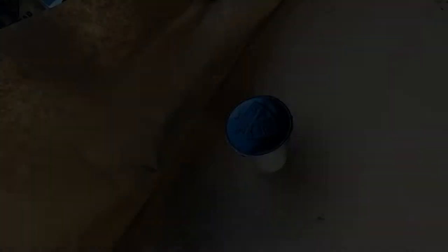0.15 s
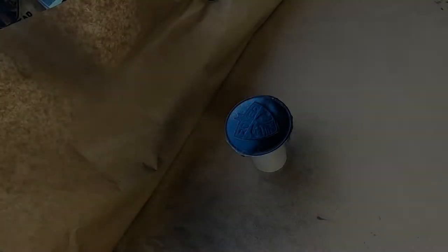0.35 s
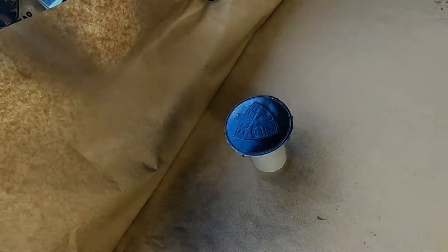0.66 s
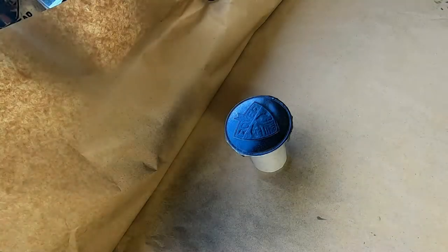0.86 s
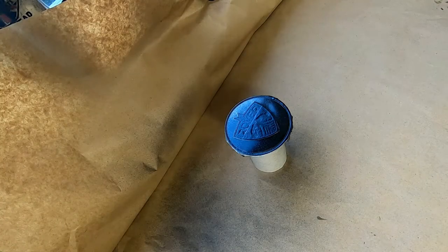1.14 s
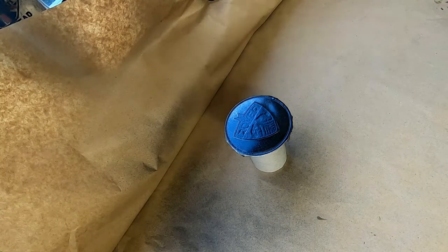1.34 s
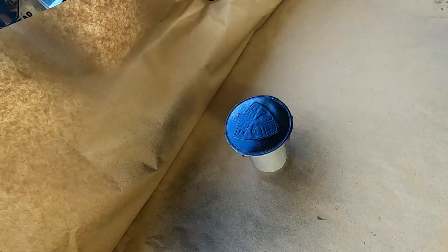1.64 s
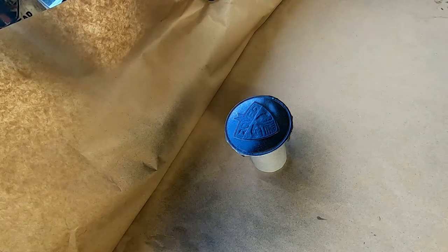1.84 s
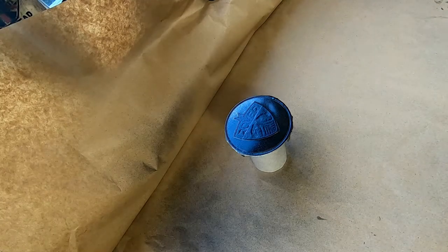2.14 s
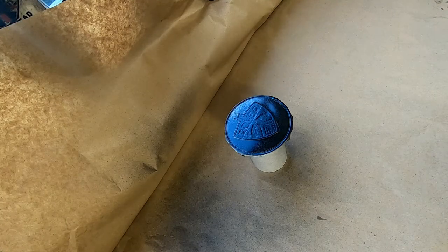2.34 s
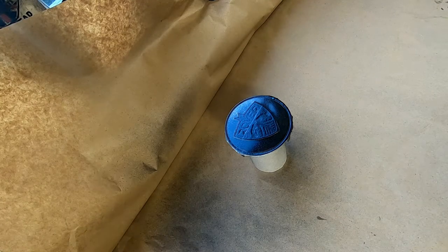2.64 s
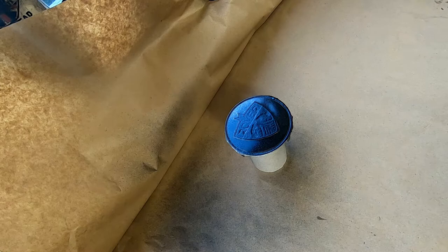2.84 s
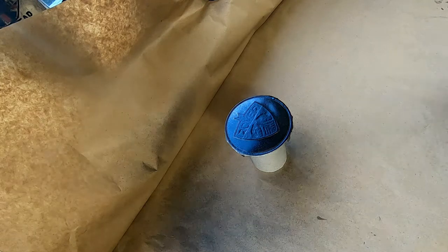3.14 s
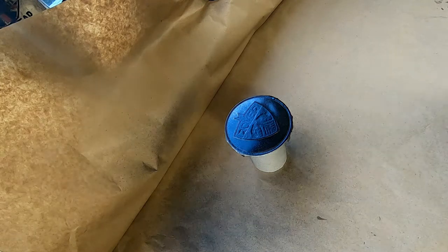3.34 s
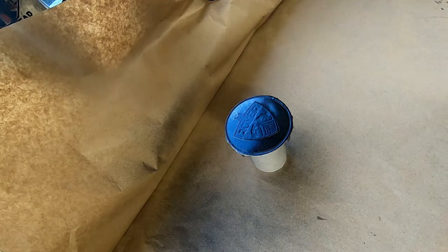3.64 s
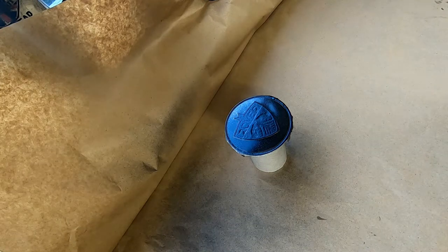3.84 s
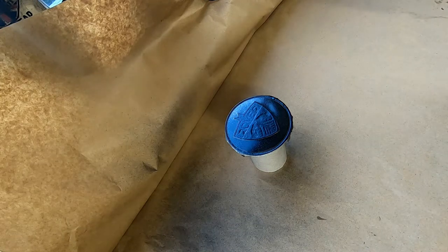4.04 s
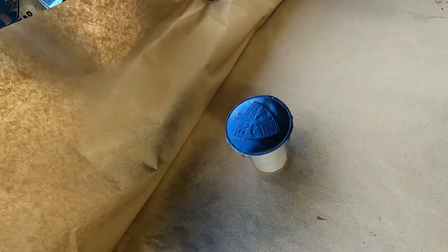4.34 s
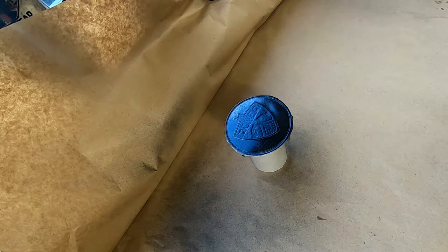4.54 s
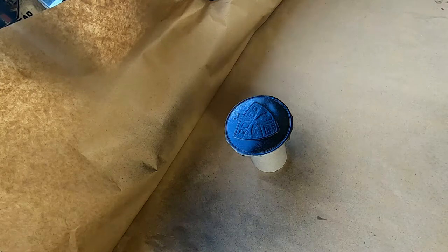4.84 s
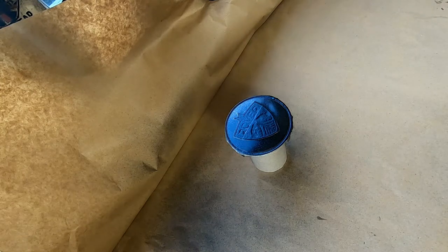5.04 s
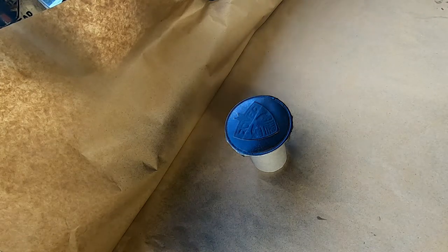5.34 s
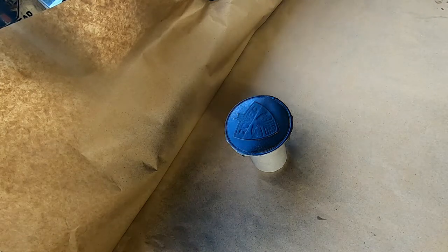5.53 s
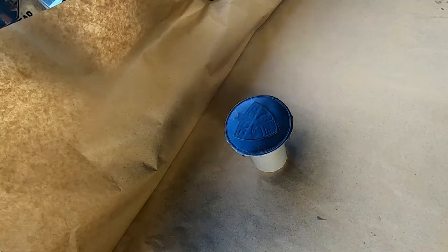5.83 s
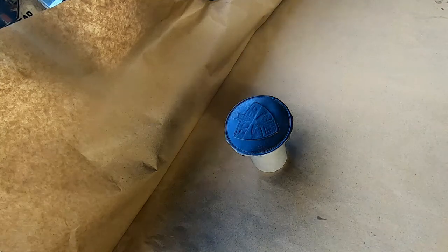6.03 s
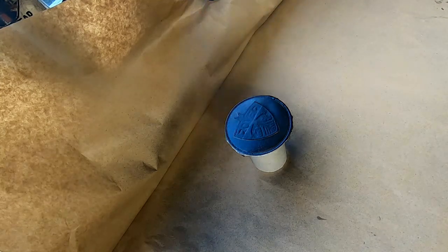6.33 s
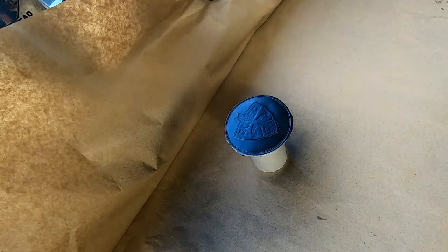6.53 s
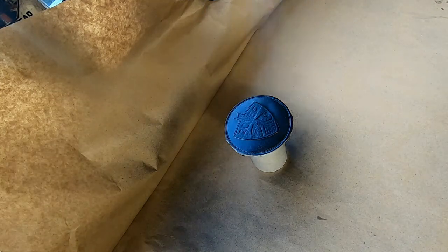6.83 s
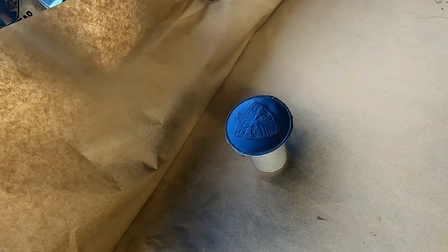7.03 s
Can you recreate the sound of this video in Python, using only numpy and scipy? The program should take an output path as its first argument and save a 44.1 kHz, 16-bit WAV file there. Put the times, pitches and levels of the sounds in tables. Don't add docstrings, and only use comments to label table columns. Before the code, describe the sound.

After a sliver of room tone and a short silence, a low booming workshop fades in. A spray can at arm's length is shaken, its steel ball clacking sharply on the damped wall, slowing to a sparse swirl, then shaken harder. The ball settles and five short airy sprays follow, with small rattles between them. Close stereo camera microphone, short room echo, treble slightly thinned.

```python
import sys
import numpy as np
from scipy import signal
from scipy.fft import rfft, irfft, next_fast_len
from scipy.io import wavfile
from scipy.ndimage import uniform_filter1d, map_coordinates

SR = 44100
rng = np.random.default_rng(int(sys.argv[2]) if len(sys.argv) > 2 else 0)


def int16_out(signal):
    q = np.round(np.clip(np.atleast_2d(signal).T, -1, 1) * 32767)
    wavfile.write(sys.argv[1], SR, q.astype(np.int16))


def boost_factor(decibels):
    exponent = np.asarray(decibels, float) / 20
    return 10 ** exponent


N = 316620


def unit(x):
    return x / np.sqrt(np.mean(x ** 2) + 1e-20)


def along(points, hz):
    f, v = np.transpose(points)
    return np.interp(np.log(hz + 1), np.log(f + 1), v)


def wobble(rate):
    knots = rng.standard_normal(int(N * rate / SR) + 4)
    return map_coordinates(knots, [np.arange(N) * rate / SR])


def filtered(x, response):
    m = next_fast_len(N + SR // 2)
    return irfft(rfft(x, m) * response(np.fft.rfftfreq(m, 1 / SR)), m)[..., :N]


# [pitch_hz, likeness]
LIKENESS = [(60, .84), (500, .92), (1500, .985), (7000, .95), (12000, .6)]


def rush(spectrum):
    def mid_side(hz):
        turn = np.arccos(np.clip(along(LIKENESS, hz), -1, 1)) / 2
        return boost_factor(along(spectrum, hz)) * [np.cos(turn), np.sin(turn)]

    mid, side = filtered(rng.standard_normal((2, N)), mid_side)
    return unit(np.array([mid + side, mid - side]))


# [time_s, level_db]
BOOM = [(0, -65), (.45, -63), (.62, -69.5), (1, -61.5), (1.7, -60.5), (1.85, -65), (2, -66.5),
        (2.25, -63.5), (3.1, -64), (3.6, -52.5), (4.2, -58.5), (4.6, -65.5), (5.1, -62.5), (5.62, -64),
        (5.75, -68), (6.2, -66.5), (6.6, -64.5), (7.2, -62.5)]
# [pitch_hz, level_db per Hz]
AIR = [(120, -28), (200, -11), (300, -9), (420, -18), (870, -18), (4000, -24.5), (7000, -43.5),
       (9500, -45.5), (12500, -74)]
# [pitch_hz, level_db per Hz]
RUMBLE = [(20, -25.5), (100, -19.5), (118, -15.5), (130, 0), (142, -3.5), (200, -4), (300, -40.5)]
# [centre_s, level_db, half_length_s, pitch_hz]
HUMS = [
    (2.05, -46, 0.068, 130),
    (5.54, -50.5, 0.084, 130),
    (2.47, -48, 0.13, 1620),
    (2.51, -53, .03, 1300),
    (1.213, -50, .012, 13700),
    (1.72, -53, .04, 128),
]


def room_tone():
    t = np.arange(N) / SR
    boom_db = np.interp(t, *np.transpose(BOOM))
    hum = np.zeros(N)
    for s, db, half_s, hz in HUMS:
        note = np.sin(2 * np.pi * hz * t + 1.4 * wobble(hz / 10))
        hum += boost_factor(db) * np.exp(-((t - s) / half_s) ** 2) * note
    air_db = -64.5 + 1.34 * (boom_db + 63.5) + 1.4 * wobble(1)
    return boost_factor(air_db) * rush(AIR) + boost_factor(boom_db) * rush(RUMBLE) + hum


def struck(place):
    near_db, loss_db = np.array([-1, -3.5, 2, -8]), np.array([16.5, 26, 100, 18])
    away = np.clip([place + 0.22, abs(place + 0.12) - .2, .1 - place, .8 - place], 0, 2)
    return near_db - loss_db * away


# [pitch_hz, spread_share, level_db]
CAN = [(1611, 0.077, -5), (2732, 0.045, -5.5), (4546, 0.065, -6), (6270, 0.12, -4.5)]
# [pitch_hz, level_db per Hz]
TICK = [(60, -43.5), (250, -14.5), (1000, -6), (1500, -0.5), (4600, -3.5), (7800, -21), (8700, -25),
        (10400, -22.5), (14000, -44)]
# [time_s, treble_db]
FACING = [(.5, 6.5), (1.2, 7.5), (2, 4), (2.9, -4), (3.35, 8), (3.621, 2), (3.74, -2.5), (3.82, -2.5),
          (3.9, 3.5), (4.3, -2.5), (7, 3)]
# [start_s, low_wall_hz, dome_hz]
TONES = [(0.518, 1850, 3670), (0.567, 1760, 3550), (0.577, 1940, 4220), (0.589, 1660, 4100),
         (0.637, 1930, 4580), (0.681, 1850, 4850), (0.89, 1910, 4120), (0.921, 2050, 4440),
         (0.95, 1410, 4130), (0.964, 1560, 4450), (1.062, 1740, 4390), (1.083, 1462, 3590),
         (1.211, 1810, 4430), (1.247, 1520, 4530), (1.278, 1440, 3960), (1.42, 1580, 4470),
         (1.456, 1534, 4100), (1.527, 1505, 4430), (1.551, 1930, 4660), (1.607, 1630, 4310),
         (1.66, 1670, 4410), (1.735, 1815, 4230), (1.782, 1350, 4700), (1.92, 1775, 4750),
         (2.006, 1710, 4590), (2.158, 1630, 4640), (2.352, 1630, 4400), (2.418, 1580, 4450),
         (2.621, 1670, 3590), (2.952, 1850, 3560), (3.333, 1745, 3620), (3.385, 1530, 4580),
         (3.391, 1715, 4720), (3.495, 1510, 4260), (3.508, 1540, 3950), (3.514, 1480, 4610),
         (3.52, 1690, 4630), (3.578, 1950, 3530), (3.621, 1540, 4190), (3.628, 1770, 4530),
         (3.643, 1870, 4510), (3.655, 1880, 4280), (3.759, 1890, 4850), (3.783, 1660, 4120),
         (3.883, 1700, 4500), (3.892, 1980, 4640), (3.934, 1360, 4625), (4.053, 1570, 4260),
         (4.082, 1720, 4685), (4.104, 2040, 4060), (4.117, 1760, 3980), (4.148, 2020, 4100),
         (4.232, 1770, 4550), (4.267, 1520, 4560), (4.438, 1750, 4030), (4.669, 1780, 3660),
         (5.076, 1600, 4500), (5.57, 1654, 4480), (6.066, 1310, 4520), (6.621, 1940, 4280)]
# [start_s, level_db, contact_ms, place (-1 low wall .. 1 dome)]
LOOSEN = [(.4778, -47.5, 2.5, -0.42), (.5176, -32, 1.1, -0.46), (.5376, -40.5, 1.9, -0.41),
          (.5667, -32, 4, 1), (.5774, -12.5, 0.71, 1), (.5888, -22, 4, 0.53), (.6373, -26, 2.1, 0.56),
          (.6675, -22.5, 0.66, 0.35), (.681, -23.5, 1.3, 0.092), (.6855, -26, 1.5, -0.008),
          (.8535, -31, 0.91, -0.64), (.7516, -27, 0.76, -0.68), (.8077, -27.5, 1.1, -0.6),
          (.8373, -29, 2.8, -1.1), (.8905, -29, 2.4, 0.073), (.9015, -29, 1.3, 0.95),
          (.9212, -18.5, 1.04, 0.033), (.93, -26, 1.3, 0.16), (.9503, -21, 1.4, -1.2),
          (.9652, -18.5, 1.8, -0.4), (.987, -30, 1.5, -1.3), (1.011, -29.5, 1.4, 0.13),
          (1.062, -21.5, 1.4, -0.37), (1.0845, -14.5, 1.36, -0.54), (1.1216, -28, 4.1, -1.1),
          (1.2115, -16.5, 1, -0.069), (1.2164, -15.5, 3.3, -0.02), (1.2, -32.5, 6, 0.52),
          (1.313, -31, 1.8, -0.093), (1.2468, -11, 1.2, -0.81), (1.2777, -18, 1.06, -0.35),
          (1.2907, -23.5, 2.2, -0.026)]
# [start_s, level_db, contact_ms, place]
SLOWING = [(1.348, -23.5, 3.8, -0.5), (1.41, -29, 2.4, 0.08), (1.4203, -13.5, 1.24, 0.53),
           (1.433, -25, 4.3, 0.48), (1.4556, -16, 2.4, -0.66), (1.475, -20.5, 2.1, -0.88),
           (1.519, -19.5, 2.4, 0.041), (1.5275, -10, 1.4, 0.079), (1.5477, -17.5, 2, 0.51),
           (1.608, -13.5, 1.7, -0.89), (1.661, -16, 1.5, -0.54), (1.7347, -19.5, 1.6, -1.03),
           (1.7646, -23.5, 1.6, -0.47), (1.782, -18, 1.7, 0.42), (1.8842, -26, 1.3, -0.32),
           (1.92, -26, 1.3, 0.086), (1.932, -31.5, 2.4, -0.12), (1.9703, -29.5, 0.54, 0.57),
           (2.006, -23.5, 1.9, 0.12), (2.042, -29, 1.8, -0.78), (2.05, -32, 2.3, 0.095),
           (2.069, -36.5, 2.5, 0.11), (2.086, -38, 2.1, -0.53), (2.1583, -24, 1.9, 0.093),
           (2.189, -30.5, 2.1, 0.058), (2.247, -40, 1.3, 0.92), (2.2667, -30.5, 0.8, -1.8),
           (2.3528, -30, 2.1, 0.021), (2.403, -34, 1.3, -0.31), (2.418, -39, 4.4, 0.073),
           (2.621, -45, 2.8, 0.082), (2.821, -61, 1.5, .9), (2.838, -43.5, 2.4, 0.035),
           (2.855, -37.5, 2.9, 0.031), (2.872, -36.5, 2.6, 0.044), (2.925, -52, 1.5, -0.26),
           (2.947, -40, 2.5, -0.0066), (2.96, -35, 1.7, -0.26), (2.383, -42, 1.7, -0.37),
           (2.982, -36, 1.7, 0.054), (2.899, -34.5, 2.2, 0.0039), (2.952, -24.5, 1.07, 0.21)]
# [start_s, level_db, contact_ms, place]
HARD = [(3.308, -29.5, 2.2, -0.0065), (3.333, -18.5, 1.6, -0.48), (3.3482, -21.5, 1.6, -0.17),
        (3.377, -24.5, 5.7, 0.013), (3.3863, -12, 2, -0.053), (3.391, -11.5, 1.9, 0.033),
        (3.488, -32, 5.5, -0.074), (3.497, -18.5, 2, 0.29), (3.504, -18.5, 1.9, 0.42),
        (3.5083, -9.5, 1.3, 0.56), (3.515, -17, 1.8, 0.65), (3.5204, -8.5, 1.1, 0.86),
        (3.5302, -21, 1.5, 0.84), (3.548, -27, 1.6, -1.3), (3.58, -17.5, 2, 0.08), (3.5905, -19, 2, -0.042),
        (3.614, -28, 1.9, -.6), (3.622, -14, 1.6, -0.79), (3.629, -14.5, 1.2, 1),
        (3.6354, -18.5, 1.4, 0.42), (3.6455, -10.5, 1.2, -0.89), (3.655, -16.5, 1.6, -0.024),
        (3.752, -24, 9.6, 0.49), (3.7589, -8.5, 1.3, 0.95), (3.7665, -23.5, 1.5, 0.96),
        (3.7835, -10, .8, 0.65), (3.7949, -24, 1.5, 1), (3.847, -27.5, 6, 0.52), (3.864, -21, 1.3, -0.35),
        (3.8836, -13, 1.6, 0.024), (3.893, -18.5, 1.9, 0.22), (3.93, -24.5, 1.8, 0.43),
        (3.9347, -14, 1.6, 0.41), (3.945, -19, 0.96, -0.047), (4.0537, -13.5, 1.26, -0.5),
        (4.078, -19.5, 2.4, 0.58), (4.0821, -10, 1, 1), (4.0916, -22.5, 0.59, 0.95), (4.1054, -18, 2, 0.19),
        (4.1169, -12, 0.36, -0.52), (4.148, -18, 1.4, 0.018), (4.173, -31, 3.3, -0.36),
        (4.221, -21.5, 3.4, -0.66), (4.2321, -12.5, 1.08, 0.08), (4.242, -27, 2.2, 0.94),
        (4.262, -24.5, 1, 0.25), (4.2681, -16, 1.33, 0.082)]
# [start_s, level_db, contact_ms, place]
SETTLE = [(4.367, -29, 3.5, 0.024), (4.4372, -18.5, 0.88, 0.022), (4.442, -22, 1.2, -0.068),
          (4.4705, -22.5, 0.95, -0.61), (4.526, -29.5, 0.35, -0.39), (4.5687, -31, 1.16, -0.054),
          (4.6231, -27, 0.74, 0.012), (4.6692, -26, 2.2, 0.054), (5.045, -30.5, 1.3, 0.098),
          (5.0766, -27.5, 2.3, 0.054), (5.13, -32.5, 2.2, -0.49), (5.162, -40, 1.5, 0.27),
          (5.184, -39, 1.9, -0.45), (5.5294, -39, 3.6, -0.057), (5.5698, -28, 1.5, 0.099),
          (5.607, -33.5, 1.5, 0.072), (5.632, -36.5, 2.3, -0.3), (5.652, -45, 1.8, 0.21),
          (5.722, -48.5, 2, 0.042), (6.0655, -39.5, 2.7, 0.075), (6.275, -59, 1.3, 0.1),
          (6.621, -27, 2.05, 0.041), (6.6727, -32.5, 0.87, -0.14), (6.687, -31, 0.47, 0.019),
          (6.702, -40, 1.9, -0.18), (6.7252, -35, 0.67, 0.026), (6.74, -38.5, 1.4, -0.024),
          (7.105, -35, 1.5, -0.4)]
# [start_s, level_db, contact_ms, place]
REBOUNDS = [(0.9705, -29, 1.5, -.5), (1.2297, -26, 1.5, 0.26), (1.2552, -26, 1.5, -0.35),
            (1.371, -25, 1.5, -0.47), (1.5564, -25.5, 1.5, 0.65), (1.5645, -28, 1.5, .3),
            (1.5685, -27, 1.5, -0.1), (1.5838, -29, 1.5, -0.17), (1.7702, -26, 1.5, -0.38),
            (2.0005, -26.5, 1.2, 0), (3.4058, -26.5, 1.5, 0), (3.413, -32, 1.5, 0), (3.4308, -31.5, 1.5, 0),
            (3.44, -27.5, 1.5, 0.17), (3.545, -27, 1.2, 0.38), (3.68, -24.5, 1.5, 0),
            (3.7, -30, 1.5, 0.066), (3.7763, -30, 1.5, 0.79), (3.825, -28, 1.2, 0.58),
            (3.8732, -26, 1.5, 0), (4.0853, -28, 1.2, 0.91), (4.1348, -20.5, 1.5, -.3),
            (4.2729, -23, 1.2, 0), (6.078, -51, 2, -.2), (6.086, -54, 2, -.2), (6.838, -49.5, 2, 0),
            (6.85, -54, 2, 0.046), (7.13, -49, 2, -0.13)]


def knocks():
    rise_s, ring_s = 0.0014, 0.0021
    linger_db, linger_s = [-14, -15, -11, -25.5], 0.0062
    split_hz, sheen_hz = 3500, 8600
    dull_db, bright_db = -11.5, 20.5
    can, crack = np.zeros(N + SR), np.zeros((2, N + SR))
    t = np.arange(-SR // 50, SR // 25) / SR
    when, low_hz, dome_hz = np.transpose(TONES)
    offset = np.linspace(-1.3, 1.3, num=6)[:, None]
    for s, db, contact_ms, place in [*LOOSEN, *SLOWING, *HARD, *SETTLE, *REBOUNDS]:
        at = round(s * SR) - SR // 50
        here = slice(at, at + len(t))
        luck = rng.standard_normal((2, 4, 6, 1))
        k = np.abs(when - s).argmin()
        shape = np.exp(np.where(t < 0, t / rise_s, -t / ring_s) / np.clip(contact_ms, .4, 8))
        size = np.linalg.norm(shape)
        centres = [low_hz[k], CAN[1][0], .98 * dome_hz[k], CAN[3][0]]
        clusters = zip(centres, CAN, struck(place), linger_db, *luck)
        for hz, (_, spread, gain_db), share_db, tail_db, detune, phase in clusters:
            mode_hz = hz * np.exp(spread * (.3 * detune + offset))
            mode_gain = boost_factor(2.5 * detune[::-1] - 3.6 * offset ** 2)
            modes = mode_gain * np.sin(2 * np.pi * mode_hz * t + 2 * phase)
            tail = boost_factor(tail_db) * (t > 0) * np.exp(-t / linger_s)
            ring = (shape + tail) * modes.sum(0)
            can[here] += boost_factor(db + share_db + gain_db) * ring * size / np.linalg.norm(ring)
        tilt_db = np.array([[dull_db * max(place, 0)], [bright_db * min(place, 0)]])
        snap = shape * rng.standard_normal(len(t))
        crack[:, here] += boost_factor(db - 4.5 + tilt_db) * snap * size / np.linalg.norm(snap)

    def bands(hz):
        dull = 1 / (1 + (hz / split_hz) ** 2)
        sheen = 1 / (1 + (sheen_hz / (hz + 1)) ** 16)
        return boost_factor(along(TICK, hz)) * [dull, 1 - dull - sheen, sheen]

    norm = np.std(filtered(rng.standard_normal(N), lambda hz: boost_factor(along(TICK, hz))))
    low, high, top = filtered(crack[[0, 1, 1], :N], bands)
    facing = boost_factor(np.interp(np.arange(N) / SR, *np.transpose(FACING)))
    return can[:N] + (low + high + top * facing) / norm


# [centre_s, level_db, half_length_s, brightness_db]
SWIRLS = [(0.723, -42, 0.075, -1), (0.963, -44.5, 0.12, -1), (1.387, -39, 0.054, -5.5),
          (1.546, -30, 0.038, -3), (1.95, -53.5, 0.21, -15), (2.288, -47.5, 0.14, -4.5),
          (2.5, -55, 0.15, -3.5), (2.732, -63.5, 0.062, 3), (2.947, -48.5, 0.11, 1.5),
          (3.207, -53.5, 0.06, -6), (3.435, -38.5, 0.1, -1), (3.629, -27.5, 0.034, 2),
          (3.908, -44.5, 0.12, -12), (4.145, -36.5, 0.028, -31), (4.432, -41.5, 0.023, -5),
          (5.128, -49, 0.081, 0), (5.586, -53.5, 0.082, 1), (6.69, -50.5, 0.091, -3),
          (7.115, -55, 0.051, 0)]


def motion():
    stir_db, stir_bright_db, stir_t60_s, stir_rise_s = -24, 5, 0.31, 0.004
    t, power = np.arange(N) / SR, np.zeros((2, N))
    for s, db, _, place in [*LOOSEN, *SLOWING, *HARD, *SETTLE]:
        tilt_db = stir_bright_db * np.array([-place, place - .4])
        power[:, round(s * SR)] = boost_factor(2 * (db + stir_db + tilt_db))
    after = boost_factor(-120 * t[:SR] / stir_t60_s) * (1 - np.exp(-t[:SR] / stir_rise_s))
    power = np.abs(signal.fftconvolve(power, after[None], axes=1)[:, :N])
    for s, db, half_s, bright_db in SWIRLS:
        level_db = db + np.array([[0], [bright_db]])
        power += boost_factor(2 * level_db) * np.exp(-2 * ((t - s) / half_s) ** 2)
    return np.sqrt(power)


# [pitch_hz, width_hz, level_db]
WALL = [(700, 240, -2), (1670, 650, 1.5), (2590, 910, -5), (3220, 1200, -6), (4550, 710, -2.5),
        (7620, 5800, -18.5)]


def roll():
    dull, bright = motion()
    contacts = unit(rng.standard_normal(N) * boost_factor(2.4 * wobble(400) + .8 * wobble(60)))

    def resonances(modes, f):
        total = 0
        for k, (c, w, db) in enumerate(modes):
            total = total + (-1) ** k * boost_factor(db) * 1j * f * w / (c * c - f * f + 1j * f * w)
        return total

    low = filtered(contacts, lambda f: resonances(WALL[:3], f) / (1 + (650 / (f + 1)) ** 4))
    high = filtered(contacts, lambda f: resonances(WALL[3:], f) / (1 + (f / 11500) ** 8))
    return dull * unit(low) + bright * unit(high)


# [pitch_hz, t60_s]
SHOP = [(200, 0.39), (2000, 0.38), (6000, 0.41), (12000, 0.3)]


def shop(x):
    out, step = np.zeros((2, N + 2 * SR)), SR // 3
    for at in range(0, N, step):
        hz, t, z = signal.stft(rng.standard_normal((2, SR // 2)), SR, nperseg=256)
        bass_width = 1 + 1.2 / (1 + (hz / 800) ** 4)
        z = z * [[[1]], [[.2]]] * np.array([hz ** 0, bass_width])[..., None]
        decay = boost_factor(-60 * t / along(SHOP, hz)[:, None])
        mid, side = signal.istft(z * decay, SR, nperseg=256)[1]
        echo = np.array([mid + side, mid - side]) / np.linalg.norm(mid)
        answer = signal.fftconvolve(x[None, at:at + step], echo, axes=1)
        out[:, at + 200:at + 200 + answer.shape[1]] += answer
    return out[:, :N]


# [start_s, level_db, pitch_hz, t60_s]
GRIPS = [
    (.694, -47, 520, .07),
    (.7148, -40, 430, .09),
    (.722, -45, 240, .07),
    (.74, -52, 460, .25),
    (.768, -49, 330, .07),
    (1.452, -50, 300, .05),
    (1.526, -41, 338, .04),
    (2.267, -52, 299, .2),
    (3.383, -42, 338, .05),
    (3.621, -43, 306, .09),
]


def grips():
    out, t = np.zeros(N + SR), np.arange(SR // 4) / SR
    for s, db, hz, t60 in GRIPS:
        offset = np.linspace(-1.5, 1.5, num=8)[:, None] + 0.16 * rng.standard_normal((8, 1))
        ring = np.sin(2 * np.pi * hz * np.exp(.17 * offset) * t).sum(0)
        out[round(s * SR):][:len(t)] += boost_factor(db - 60 * t / t60) * (1 - np.exp(-t / 0.0016)) * ring
    return out[:N]


# [open_s, length_s, flow_db, near_db (aimed near), nearest_share (of the press)]
PRESSES = [
    (4.673, 0.2, -37, -43, 0.67),
    (5.2, 0.2, -36, -40.5, 0.54),
    (5.743, 0.19, -36, -41.5, 0.58),
    (6.302, 0.16, -35.5, -42, 0.59),
    (6.867, 0.16, -35, -43, 0.61),
]


def valve():
    open_db_per_s, shut_db_per_s, open_s, shut_s = 738, 703.5, 0.025, 0.015
    sweep_sag_db, aside_db = 59, -13
    flow_sag_db, flow_peak, flow_bend = 23, -.03, 1.54
    t = np.arange(N) / SR
    s, length, flow_db, near_db, nearest = np.transpose(PRESSES)[..., None]
    opening_db = open_db_per_s * np.minimum(t - s - open_s, 0)
    gate_db = opening_db + shut_db_per_s * np.minimum(s + length - shut_s - t, 0)
    share = (t - s) / length
    near = near_db + gate_db + np.maximum(aside_db, -sweep_sag_db * (share - nearest) ** 2)
    flow = flow_db + gate_db - flow_sag_db * np.abs(share - nearest - flow_peak) ** flow_bend
    gone = np.take_along_axis(np.clip(share, 0, 1), flow.argmax(0)[None], axis=0)[0]
    return near.max(0), flow.max(0), gone


def patchy(x, depth_db=2.5):
    z = signal.stft(x, nperseg=512)[2]
    field = uniform_filter1d(rng.standard_normal(z.shape[1:]), size=5, axis=0)
    field = uniform_filter1d(field, size=6, axis=1)
    return unit(signal.istft(z * boost_factor(depth_db * unit(field)), nperseg=512)[1][:, :N])


# [pitch_hz, level_db per Hz]
HISS = [(3530, -46), (6000, -31.5), (7030, -5.5), (8510, -14.5), (12900, -8), (13700, -18), (15500, -32.5)]
# [pitch_hz, level_db per Hz]
JET = [(650, -51), (1100, -4.5), (1450, -2), (2450, 0), (3300, -1), (4400, 1), (5600, -5), (8000, -8.5),
       (10400, -16.5), (17600, -120)]
# [pitch_hz, level_db per Hz]
WASH = [(35, -62), (60, -24), (146, 3), (518, -2), (657, 6), (834, 2), (1200, -16), (1560, -35.5),
        (2640, -120)]


def spray():
    near_db, jet_db, gone = valve()
    sputter_db = 1.6 * wobble(400) + .4 * wobble(50)
    hiss = boost_factor(near_db + 2.5 + sputter_db + .8 * wobble(21)) * patchy(rush(HISS)) * boost_factor([[1.2], [-1.2]])
    jet = boost_factor(jet_db + 4.5 + sputter_db) * patchy(rush(JET))
    stem_db = jet_db - 1.5 - 9.5 * gone - 5.4 * (np.arange(N) / SR - 6.0) + 0.49 * wobble(8.2)
    stem = boost_factor(stem_db) * rush([(2150, -28.0), (2480, -6), (2850, -35.0)])
    wash = boost_factor(near_db + 0.15 + 1.4 * wobble(60)) * rush(WASH)
    return hiss + jet + stem + wash


def scene():
    ball, jet = knocks() + grips(), spray()
    near = (ball + roll()) * boost_factor([[-.3], [.3]]) + jet * boost_factor([[-.2], [.2]])
    answer = shop(boost_factor(-9.0) * ball + boost_factor(-10.0) * jet.mean(0))
    return near + answer + room_tone()


# [pitch_hz, level_db under the frame]
STARVED = [(8200, -31), (8900, -31), (9400, -36), (11100, -36), (11700, -31), (13300, -35), (13900, -29),
           (15700, -28)]


def starve(x, luck_db=6.5, size=6):
    hz, _, z = signal.stft(x, SR, nperseg=2048)
    power = np.abs(z) ** 2
    keep = np.ones(z.shape)
    budget = uniform_filter1d(rng.standard_normal(power[:, 0].shape), size=5) * .8 * luck_db
    for k in range(np.searchsorted(hz, STARVED[0][0]), len(hz), size):
        share = power[:, k:k + size].sum(1) / (power.sum(1) + 1e-12)
        mood = budget + uniform_filter1d(rng.standard_normal(share.shape), size=2) * luck_db
        keep[:, k:k + size] = (share > boost_factor(2 * (along(STARVED, hz[k]) + mood)))[:, None]
    return signal.istft(z * keep, SR, nperseg=2048)[1][:, :N]


def top_cut(x):
    return signal.sosfilt(signal.butter(12, 15690, fs=SR, output="sos"), x)


def record(dry):
    cut_s, fade_s, fade_length_s = .044, 0.27, 0.061
    t = np.arange(N) / SR
    fade = np.where(t < cut_s, 1, np.clip((t - fade_s) / fade_length_s, 0, 1))
    mix = starve(dry) * fade
    return top_cut(mix)


dry = scene()
out = record(dry)
int16_out(out)
```